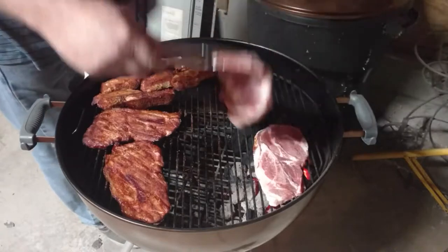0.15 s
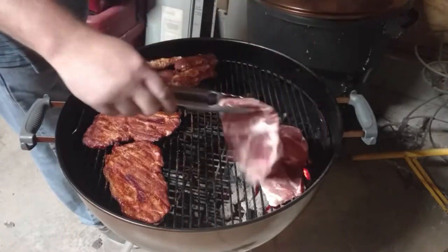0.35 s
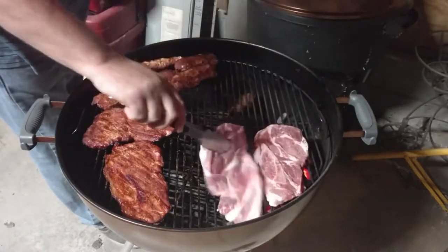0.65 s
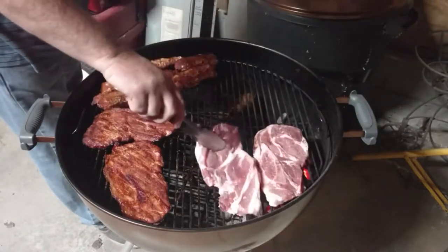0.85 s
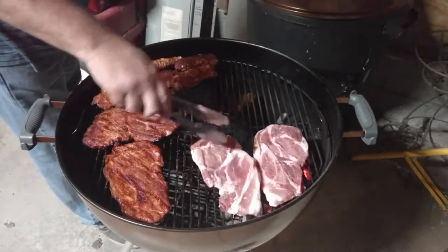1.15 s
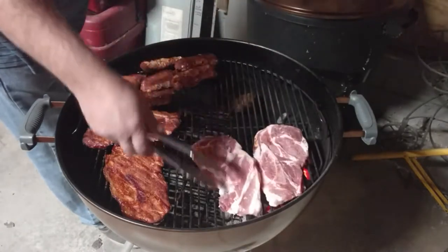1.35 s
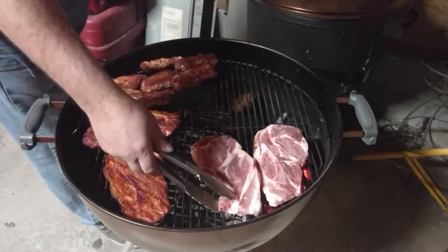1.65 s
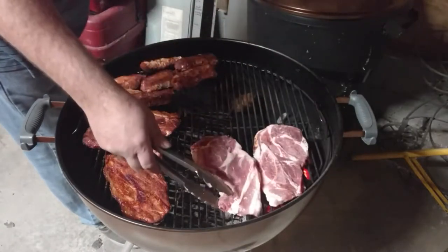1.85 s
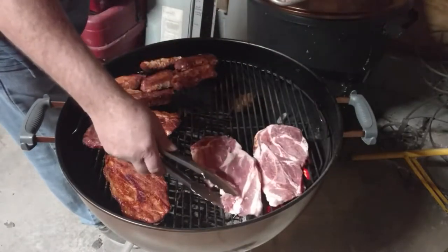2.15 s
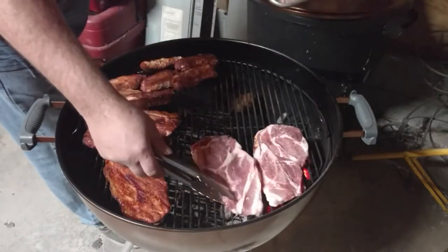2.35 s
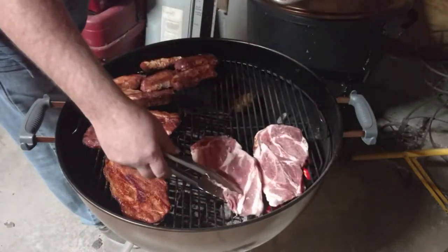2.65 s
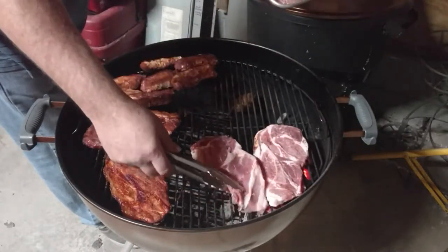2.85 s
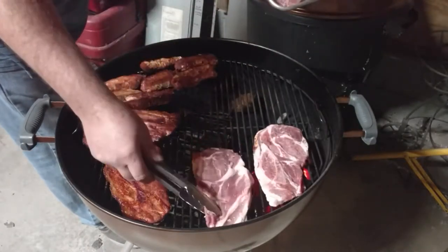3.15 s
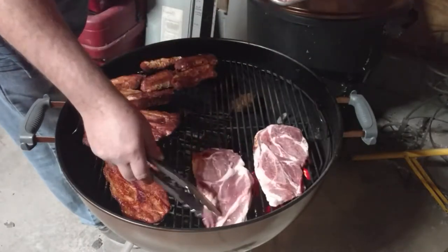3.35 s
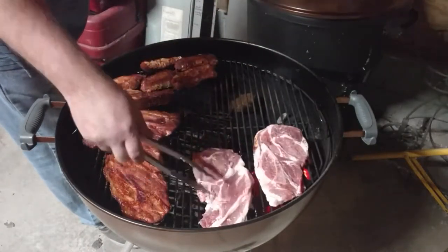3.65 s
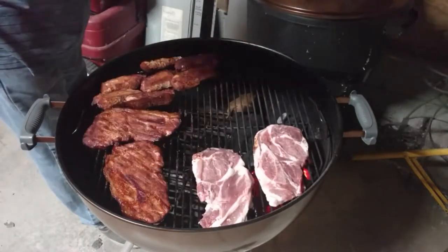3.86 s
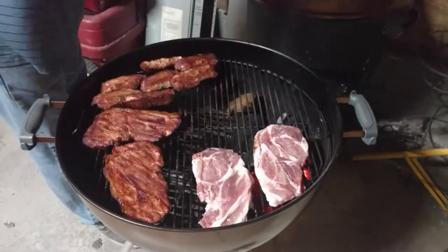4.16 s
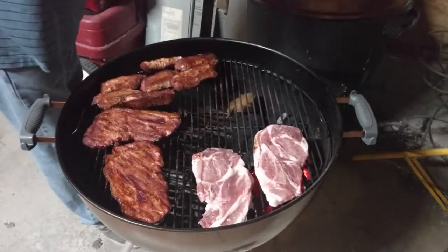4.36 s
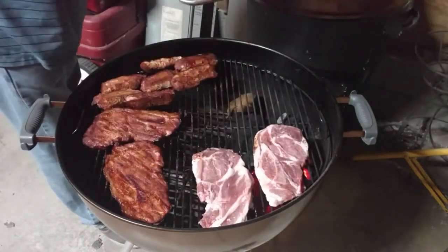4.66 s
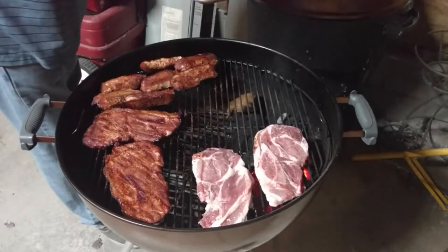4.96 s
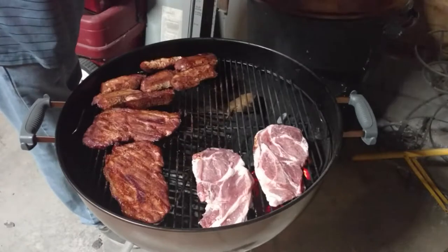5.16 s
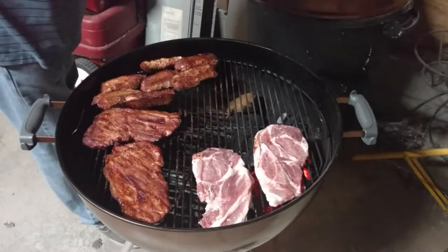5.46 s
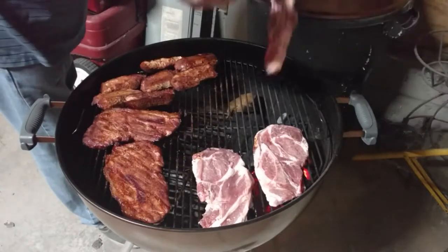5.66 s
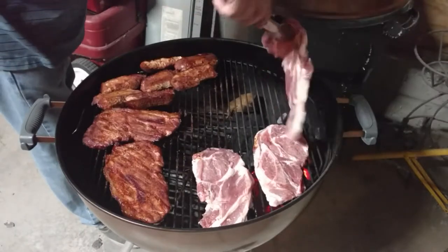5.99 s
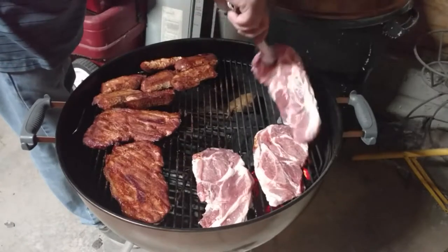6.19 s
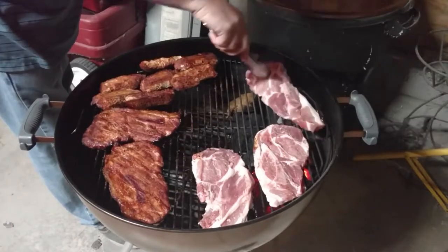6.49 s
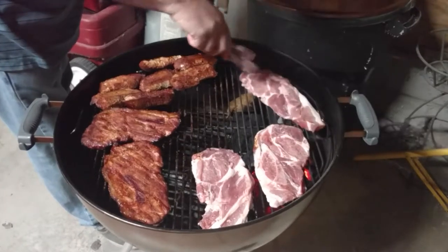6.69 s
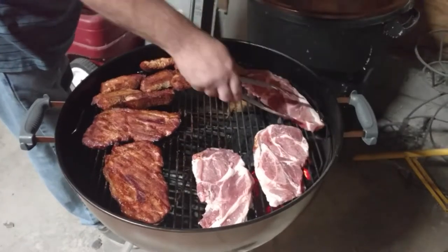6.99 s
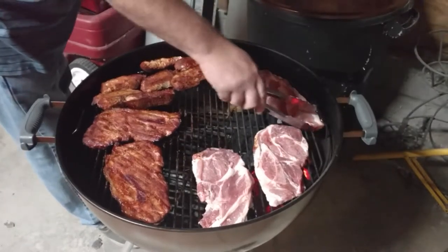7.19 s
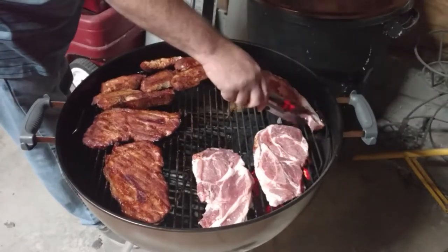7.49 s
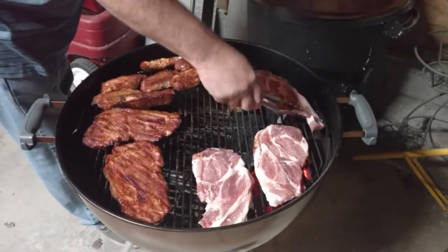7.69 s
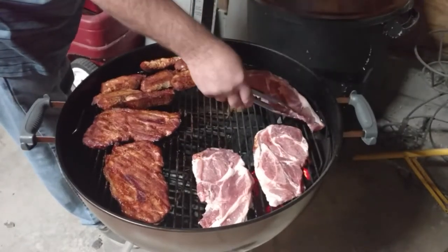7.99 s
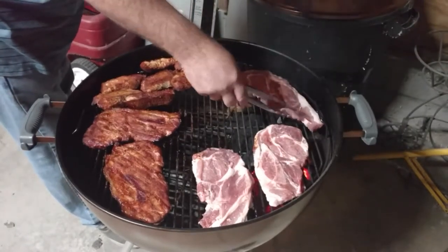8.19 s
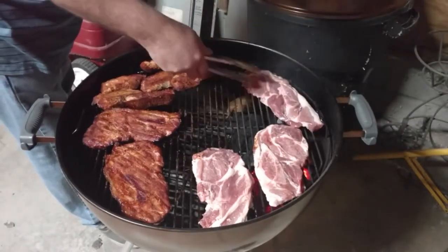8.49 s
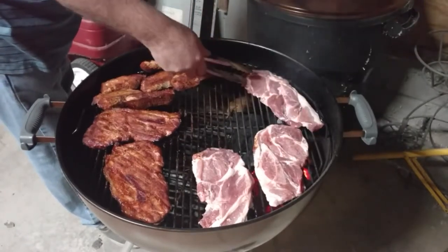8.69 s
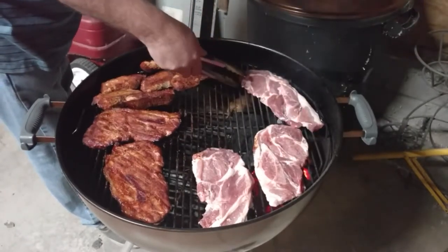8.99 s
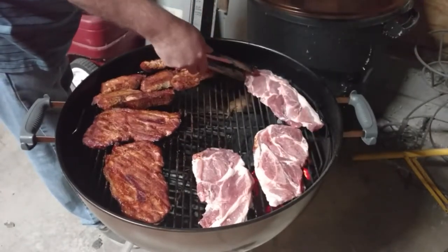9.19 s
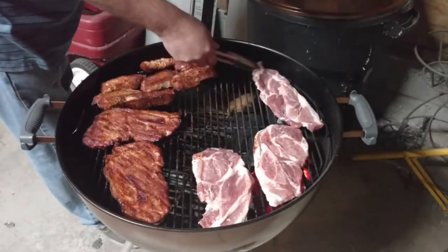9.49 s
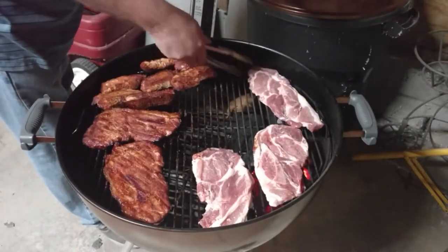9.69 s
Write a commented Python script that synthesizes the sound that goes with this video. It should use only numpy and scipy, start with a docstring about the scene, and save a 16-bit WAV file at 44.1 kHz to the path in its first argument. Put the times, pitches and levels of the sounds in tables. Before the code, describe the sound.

Close to an outdoor charcoal grill, steaks land with soft flops and steel tongs clink against the rattling wire grate. A loud, sharp snap on a tray and a short scrape interrupt, after which everything is briefly quieter. One more piece of meat goes down and the tongs clatter again, last of all near the end. A gentle sizzle, a faint humming fan and a low yard rumble continue throughout.

```python
"""Meat sizzles softly, a fan hums nearby and the yard rumbles low. The sizzle is tiny bursts of fat.
Raw steaks flop onto a charcoal kettle grill and are nudged about; steel tongs tap and clank on the
wire grate, making it ring and rattle. Out of sight something hard snaps against a tray, which then
scrapes. The loud snap makes the camera's gain control turn everything down for more than a second."""
import sys
import numpy as np
from scipy import signal
from scipy.fft import rfft, irfft, next_fast_len
from scipy.io import wavfile
from scipy.ndimage import uniform_filter1d, minimum_filter1d

SR = 44100
rng = np.random.default_rng(int(sys.argv[2]) if len(sys.argv) > 2 else 0)


def store_pcm(level_fs):
    """Save levels as 16-bit WAV."""
    pcm = np.round(np.clip(level_fs, -1, 1) * 32767).astype(np.int16)
    wavfile.write(sys.argv[1], SR, np.atleast_2d(pcm).T)


N = 433944
TIME = np.arange(N) / SR
PIVOT_HZ = 1600  # "brightness" tilts a sound's spectrum around this frequency
# bands in which a hit on the grate is shaped: (low edge [Hz], high edge [Hz])
HIT_BANDS = [(125, 400), (400, 1000), (1000, 2600), (2600, 5000), (5000, 10000), (10000, 15000)]


def undb(db):
    """Turn decibels into a factor to multiply by."""
    return 10 ** (np.asarray(db) / 20)


def rms(x):
    """Average strength of a signal (root mean square)."""
    return np.sqrt(np.mean(x ** 2))


def noise(size):
    """Two unrelated channels of white noise."""
    return rng.standard_normal((2, size))


def fade(t, t60):
    """Die away smoothly; the fade time t60 is the seconds taken to drop 60 dB."""
    return np.exp(-np.log(1000) * t / t60)


def burst(t, rise_s, t60):
    """Rise to a peak of 1, then fade."""
    shape = (1 - np.exp(-t / rise_s)) * fade(t, t60)
    return shape / shape.max()


def colour(x, points):
    """Give x a tone colour from (frequency [Hz], level [dB]) points; white noise keeps its power."""
    hz, db = np.transpose(points)
    gain = undb(np.interp(np.log(np.fft.rfftfreq(x.shape[-1], 1 / SR) + 1), np.log(hz), db))
    return irfft(rfft(x) * gain / rms(gain), x.shape[-1])


def drift(turns_per_s):
    """Wander at random, roughly between -1 and 1."""
    step = int(SR / turns_per_s)
    return uniform_filter1d(np.repeat(rng.standard_normal(N // step + 1), step), step)[:N]


def grit(size, depth_db=4, slips_per_s=600):
    """Tiny slips and bounces of metal on metal make the level jump about."""
    gain = undb(depth_db * drift(slips_per_s)[:size])
    return gain / rms(gain)


def ringing(hz, gains, t60s, blur_hz, t):
    """Fading tones of struck metal, in two channels; wandering phases blur each pitch."""
    steps = np.sqrt(2 * np.pi * np.abs(blur_hz) / SR) * rng.standard_normal((len(t), len(hz)))
    phase = rng.uniform(0, 2 * np.pi, (2, 1, len(hz))) + np.cumsum(steps, axis=0)
    tones = np.sin(2 * np.pi * hz * t[:, None] + phase) * (gains * fade(t[:, None], t60s))
    return tones.sum(axis=-1) / np.sqrt(np.sum(gains ** 2) / 2)


def add(track, start_s, sound):
    """Mix a sound into the track at the given time."""
    i = int(start_s * SR)
    track[:, i:i + sound.shape[1]] += sound[:, :N - i]


def frying(start_db=-47.5, drying_db_per_s=-0.5842, rise_s=0.044):
    """Strength of the sizzle: it sinks as the meat dries and flares when meat wets the hot wires."""
    # flares from fresh or pressed meat: (time [s], level [dB], fade time [s])
    flares = [(0, -49, 1.4), (.65, -50.5, 16), (6.3, -49, 7.7), (6.325, -46.5, .14), (7.45, -49.5, 6.5)]
    power = undb(start_db + drying_db_per_s * TIME) ** 2
    for s, db, t60 in flares:
        power += (undb(db) * burst(np.maximum(TIME - s, 0), rise_s, t60)) ** 2
    return np.sqrt(power)


def sizzle(pops_per_s=3000, pop_spread_db=2, pop_db=-9, warble_db_per_octave=5, flutter_db=1):
    """Tiny bursts of fat merge into a steady hiss; a watery digital warble is added to the top treble."""
    # tone colour of frying fat: (frequency [Hz], level [dB])
    fat_colour = [(300, -15), (1000, -1), (2000, 0.5), (3200, 1.5), (4000, 2.5), (5500, 1), (7000, 2),
                  (7800, -0.5), (9200, 1.5), (10500, -5), (12000, -5), (13000, -8.5), (15000, -10.5)]
    # edges of the digital warble's bands: (frequency [Hz])
    edges = [7000, 8200, 9400, 10600, 11800, 13000, 14200, 16000]
    sizes = undb(pop_spread_db * np.minimum(rng.exponential(size=N), 4))
    pops = (rng.random(N) < pops_per_s / SR) * sizes * rng.uniform(-0.98, 1, (2, N))
    fizz = colour(noise(N) + undb(pop_db) * pops / rms(pops), fat_colour)
    size = next_fast_len(N)
    spectrum, hz = rfft(fizz, size), np.fft.rfftfreq(size, 1 / SR)
    for low, high in zip(edges, edges[1:]):
        band = irfft(spectrum * ((hz >= low) & (hz < high)), size)[:, :N]
        warble = undb(warble_db_per_octave * np.log2(low / 6000) * drift(22))
        fizz += band * (warble / rms(warble) - 1)
    return fizz / rms(fizz) * frying() * undb(flutter_db * drift(13))


def fan_air(level_db=-58, flutter_db=2.5):
    """The fan pushes air with a softly wavering rush."""
    # tone colour of the rush: (frequency [Hz], level [dB])
    air_colour = [(30, -27), (70, -5.5), (130, -1.5), (280, 2.5), (420, 1), (600, 0.5), (800, 3.5),
                  (1300, -7), (2000, -8.5), (4000, -8.5), (12000, -18)]
    return colour(noise(N), air_colour) * undb(level_db + flutter_db * drift(6.9))


def fan_hum(level_db=-56, swell_db=3.5, period_s=7.15, crest_s=7.55, speed_drift=0.0018, waver_db=1.5):
    """Fan and motor tones follow the fan's speed, slowly swell and ebb together, and waver singly."""
    # the tones: (frequency [Hz], relative level [dB])
    tones = [(118.6, -19), (279.8, -20.5), (471.3, -2), (829, -16.5), (942, -31), (1060, -20)]
    fan_time = np.cumsum(1 + speed_drift * drift(5)) / SR
    swell = undb(level_db + swell_db * np.cos(2 * np.pi * (TIME - crest_s) / period_s))
    hum = sum(undb(db + waver_db * drift(6)) * np.sin(2 * np.pi * hz * fan_time) for hz, db in tones)
    return np.sqrt(2) * swell * hum


def yard_rumble(level_db=-62, flutter_db=3.5, middle_db=-10):
    """A low, wavering rumble that mostly pushes left and right in opposite directions."""
    # tone colour of the rumble: (frequency [Hz], level [dB])
    rumble_colour = [(25, -24), (50, -11), (80, -2.5), (130, 4.5), (220, -0.5), (400, -2.5), (900, -10),
                     (3000, -68)]
    middle, side = colour(noise(N), rumble_colour) * undb(level_db + flutter_db * drift(6.9))
    return undb(middle_db) * middle + np.array([side, -side])


def hit_levels(material, db, brightness, clang_db=0, clang_hz=2500, clang_octaves=0.53):
    """Level per band: the material's colour, brighter for a sharp hit, plus the clang of bare wire."""
    centres = np.sqrt(np.prod(HIT_BANDS, axis=1))
    hz, dbs = np.transpose(material)
    material_db = np.interp(np.log(centres), np.log(hz), dbs)
    clang = clang_db * np.exp(-0.5 * (np.log2(centres / clang_hz) / clang_octaves) ** 2)
    return db + material_db + brightness * np.log2(centres / PIVOT_HZ) + clang


def grate_ring(t, t60, place):
    """The grate's tones depend on where it is hit: 0 middle, 1 front, 2 side, 3 back, or in between."""
    # tones of grate and kettle: (frequency [Hz], fade time [multiple of the hit's],
    # level when hit in the middle [dB], at the front [dB], at the side [dB], at the back [dB])
    tones = [(172, 2.2, 2, -4, 2, -3), (202, 2.2, -11, -11, 9, 0), (254.6, 2.2, -4, -10, 2, 1),
             (348.5, 2.5, -1, -0.5, -19, -2), (502, 1.7, 5.5, 9, 8.5, 7.5), (542, 2.1, -21, 10, -10, -9),
             (684, 1.9, 1, -7, -8, 11), (768, 2.7, -2, 8, -14, 10), (802, 2, -7, -3, -8, 5.5),
             (1002, 2, 3, 0, -5, -7), (1035, 2.3, 0, -2, -16, -12), (1105, 2, -10, -1, -13, -10),
             (1255, 2.2, -20, -14, 5.5, -10), (1298, 1.7, -5, -11, 4, 0.5), (1747, 1.5, -1, -2, -8, -17),
             (1875, 1.6, 5, -2, 3, -18), (2002, 1.7, 1, 2, -11, -6), (2138, 1.7, -3, 4, 15, -8),
             (2233, 1.7, 4, 1, 14, -16), (2310, 1.4, -14, -3, 12, -10), (2384, 1.8, -12, 1, 14, -7),
             (2755, 1.4, 4, -20, 10, -12), (2893, 1.6, -6, 0.5, 14, 3), (2993, 2.4, 4, 9.5, 9, -5),
             (3180, 2, -3, 8, 9, -12), (3338, 1.4, 11, 4, 3, 9), (3455, 1.5, 10, 12, 12, 10),
             (3490, 2, -2, 7, 5, 5), (3660, 1.8, 4, 5, 9.5, 4), (3737, 1.7, -14, -2, -6, 7),
             (3895, 1.5, -16, 0, -1, 5), (4700, 1.2, -5, -11, 4, -5), (4870, 1.3, 0, -6, -3, -5)]
    hz, stretch, *spots = np.transpose(tones)
    place = np.clip(place, 0, len(spots) - 1)
    gains = sum(undb(db) * max(0, 1 - abs(place - k)) for k, db in enumerate(spots))
    # the grate chatters on its rests, which blurs the high tones most
    return ringing(hz, gains, t60 * stretch, blur_hz=7 + 0.0042 * hz, t=t)


def grate_hit(band_dbs, rise_ms, t60, place, ring_db, crack_db, tick_db=14):
    """One hit on the grate: a tick, a crack, the rattle of loose wires and a ring."""
    # tone colour of loose wires: (frequency [Hz], level [dB])
    rattle_colour = [(150, 11), (1000, 1.5), (2000, 9), (2600, 6), (3300, 8), (4000, 9.5),
                     (5500, 9), (8000, 0.5), (14000, -12)]
    t = TIME[:SR // 3]
    ring = undb(ring_db) * grate_ring(t, t60, place)
    rattle = colour(noise(len(t)), rattle_colour) * grit(len(t))
    crack = undb(crack_db) * rattle * fade(t, t60=0.0081)
    # the tick is so short that only a sudden hit lets it through
    tick = undb(tick_db) * noise(len(t)) * fade(t, t60=0.0025)
    attack = 1 - np.exp(-t * 1000 / rise_ms)
    out = 0
    for edges, db in zip(HIT_BANDS, band_dbs):
        rattle_t60 = t60 * (1000 / np.mean(edges)) ** 0.17  # the treble dies first
        hit = attack * (tick + crack + ring + rattle * fade(t, rattle_t60))
        band = signal.sosfilt(signal.butter(4, edges, "band", fs=SR, output="sos"), hit)
        out += undb(db) * band / rms(band[:, :int(0.04 * SR)])  # the first 40 ms set the level
    return out


def meat_flops():
    """Soft meat lands on the grate with a dull push."""
    # flops: (time [s], level [dB], brightness [dB per octave], place [as in grate_ring])
    flops = [(0.715, -55, 1.5, 1.7), (1.690, -50.5, -0.4, 0.4), (2.068, -53.5, 1, 0.74),
             (3.215, -66, -1, -2.5), (6.325, -57, 1.5, 1.4), (8.19, -71.5, -4, 1.6)]
    # tone colour of the meat's push: (frequency [Hz], level [dB])
    meat_colour = [(220, 0.5), (630, 1), (1600, -2), (3600, -9), (7000, -7), (12000, -18)]
    out = np.zeros((2, N))
    for s, db, brightness, place in flops:
        levels = hit_levels(meat_colour, db, brightness)
        add(out, s, grate_hit(levels, rise_ms=0.78, t60=0.19, place=place, ring_db=-1, crack_db=-4))
    return out


def tong_taps():
    """Hard steel tongs strike the grate with a bright clank."""
    # taps: (time [s], level [dB], brightness [dB per octave], clang [dB], ring over rattle [dB],
    # rise [ms], fade time [s], place [as in grate_ring], crack over rattle [dB])
    taps = [(1.634, -50, -3.5, 0, 6, 1.8, .085, 0, 0), (1.893, -49.5, -0.5, -5, -6, 12, 0.14, 2.5, 2),
            (1.903, -47.5, 1.5, -8, -2, 7, 0.097, 2, 3), (2.269, -37.5, 1.3, -6, 8, 0.33, 0.12, 0, 10),
            (2.413, -50.5, -2, 0.5, -1, 1, 0.19, 2.5, 3), (3.4395, -38, -0.2, -1.5, 8, 0.15, 0.14, 1, 9),
            (3.827, -60, 3, -5, 0, 2.4, 0.046, 2.5, 3), (6.282, -63, 4.5, -8, 3, 0.23, .015, -2, -2),
            (7.2822, -36.8, 0.5, 7.5, 2, 3.5, 0.055, 2, 4), (7.297, -47, 2, 8, 4, 6.5, 0.13, 2, 3),
            (7.313, -47.5, 0, 8, 2, 1.2, 0.079, 2, 3), (7.3505, -43.5, -2.5, 5, 2.5, 1, 0.12, 2.5, 2),
            (7.403, -52, -1, -5, 1, 2, 0.27, 3, 3), (9.085, -44, -0.8, -1.5, -3.5, 1.9, 0.15, 2.5, 5),
            (9.7133, -38, -3, 4, 2, 0.55, 0.13, 3, 3), (9.7195, -40, 0.2, -0.5, 6, 1.3, 0.15, 3, 1),
            (9.728, -43.5, 0.5, 2.5, 10, 2.1, 0.16, 3, 0)]
    # tone colour of the steel's push: (frequency [Hz], level [dB])
    steel_colour = [(220, -13.5), (630, -6), (1600, 0.5), (3600, -1), (7000, -3), (12000, -23)]
    out = np.zeros((2, N))
    for s, db, brightness, clang_db, ring_db, rise_ms, t60, place, crack_db in taps:
        levels = hit_levels(steel_colour, db, brightness, clang_db)
        add(out, s, grate_hit(levels, rise_ms, t60, place, ring_db, crack_db))
    return out


def tong_pings(rise_s=0.00062, blur_hz=30):
    """Glancing touches set the tongs' own arms ringing."""
    # tones of the arms: (frequency [Hz], relative level [dB])
    arm_tones = [(4350, 2.5), (5760, -1), (6660, 0), (7040, -12)]
    # touches: (time [s], level [dB], fade time [s])
    touches = [(1.906, -44, .08), (2.27, -39, .04), (2.413, -39.5, 0.07), (3.44, -42, .06),
               (7.284, -37, .07)]
    out, t = np.zeros((2, N)), TIME[:SR // 3]
    hz, dbs = np.transpose(arm_tones)
    attack = 1 - np.exp(-t / rise_s)
    for s, db, t60 in touches:
        add(out, s, undb(db) * attack * ringing(hz, undb(dbs), t60, blur_hz, t))
    return out


def tray_snap(start_s=4.3172, rise_s=0.00004, crack_db=-17.5, crack_t60=0.0074):
    """Something hard snaps against the tray: a crack of noise and very short tones."""
    # tones of the snap: (frequency [Hz], level [dB], fade time [s])
    tones = [(326, -17.5, 0.025), (830, -21.5, 0.044), (1204, -4.5, 0.016), (1670, -13, 0.0081),
             (2330, -20, 0.01), (3520, -13, 0.0093), (4330, -20, 0.009), (5260, -19, 0.0086),
             (5800, -19.5, 0.0092), (6700, -29, 0.0049), (7980, -22, 0.008), (9340, -19, 0.018),
             (11500, -22.5, 0.01)]
    # tone colour of the crack: (frequency [Hz], level [dB])
    crack_colour = [(2000, -23), (3500, 0), (4500, 2), (6000, -1), (8000, 3), (10000, -6), (15000, -14)]
    out, t = np.zeros((2, N)), TIME[:SR // 2]
    ring = sum(undb(db) * np.exp(2j * np.pi * hz * t) * fade(t, t60) for hz, db, t60 in tones)
    ring *= 1 - np.exp(-t / rise_s)
    add(out, start_s, -np.array([ring.imag, ring.real]))  # channels a quarter cycle apart
    add(out, start_s, undb(crack_db) * colour(noise(len(t)), crack_colour) * fade(t, crack_t60))
    # a low cut removes the bass, leaving a thin, sharp snap
    return signal.sosfilt(signal.butter(4, 250, "high", fs=SR, output="sos"), out)


def rubbing(body_gain, hiss_gain, brightness):
    """Uneven rubbing makes the tray's body ring and the touching surfaces hiss."""
    # tone colour of the tray: (frequency [Hz], level [dB])
    tray_colour = [(50, -65), (150, -38), (550, -21), (780, -5.5), (1050, -3.5), (1320, -6), (1780, 5.5),
                   (2100, 2.5), (2550, -15), (2950, -3), (3400, -20), (5000, -33), (15000, -48)]
    # tone colour of the hiss: (frequency [Hz], level [dB])
    hiss_colour = [(1500, -18), (3200, 10), (4200, 6), (4800, 13), (5300, 7), (7400, 8.5), (8800, 2),
                   (10500, -9), (15000, -13)]
    size = len(body_gain)
    tilted = [(hz, db + brightness * np.log2(hz / PIVOT_HZ)) for hz, db in tray_colour]
    body = colour(noise(size), tilted)
    hiss = colour(noise(size), hiss_colour) * grit(size)
    return body_gain * body + hiss_gain * hiss


def tray_catches(rise_share=0.12, hiss_db=-12.5):
    """The tray catches as it is shifted, giving short scrapes."""
    # catches: (time [s], level [dB], fade time [s], brightness [dB per octave])
    catches = [(4.385, -38.5, 0.074, 7), (4.5185, -27, 0.0097, 2), (4.5287, -18, 0.019, 3),
               (4.5477, -13, 0.014, -0.5), (4.556, -31, 0.049, 4), (4.578, -30, .012, 5),
               (4.641, -27, 0.043, -3.5), (4.861, -37.5, 0.054, 0.5), (4.913, -46, 0.032, -4)]
    out, t = np.zeros((2, N)), TIME[:SR // 2]
    for s, db, t60, brightness in catches:
        grip = undb(db) * burst(t, rise_share * t60, 2 * t60) ** 2  # squared for a soft start
        add(out, s, rubbing(grip, undb(hiss_db) * grip, brightness))
    return out


def tray_slide(start_s=4.497, rise_s=0.013, length_s=0.15, body_db=-31.5, hiss_db=-37.5):
    """One shove of the tray: its body rings at first, and it hisses until it stops."""
    out, t = np.zeros((2, N)), TIME[:SR // 2]
    moving = (1 - np.exp(-t / rise_s)) ** 2 * fade(np.maximum(t - length_s, 0), t60=0.05)
    scrape = rubbing(undb(body_db) * burst(t, rise_s, t60=0.4), undb(hiss_db), brightness=0)
    add(out, start_s, moving * (scrape + edge_whistle(t)))
    return out


def edge_whistle(t, level_db=-32.5, start_hz=7150, climb_hz_per_s=10000, blur_hz=480, t60=0.46):
    """The tray's sliding edge gives a thin, rough whistle that climbs in pitch."""
    wander = np.sqrt(2 * np.pi * blur_hz / SR) * noise(len(t))
    phase = np.cumsum(2 * np.pi * (start_hz + climb_hz_per_s * t) / SR + wander, axis=1)
    return undb(level_db) * np.sin(phase) * fade(t, t60) * grit(len(t))


def with_echo(sound, early_db=-12, early_t60=0.072, late_db=-10, late_t60=0.41, rise_s=0.00076):
    """Nearby walls answer a sound with bright first echoes, then a duller tail."""
    # tone colour of the tail: (frequency [Hz], level [dB])
    tail_colour = [(100, -22), (300, 2), (540, 1), (800, 6.5), (1200, 0), (2000, -2.5), (3600, 1),
                   (5000, 1.5), (9000, -11), (15000, -29)]
    t = TIME[:SR // 2]
    early_fade, late_fade = fade(t, early_t60), fade(t, late_t60)
    early = undb(early_db) * noise(len(t)) * early_fade / np.linalg.norm(early_fade)
    late = undb(late_db) * colour(noise(len(t)), tail_colour) * late_fade / np.linalg.norm(late_fade)
    echoes = (early + late) * (1 - np.exp(-t / rise_s))
    return sound + signal.fftconvolve(sound[:1], echoes, axes=1)[:, :N]


def microphones(pair, balance, widest_deg=None):
    """A microphone pair turns two signals into left and right; width and balance vary with frequency."""
    # stereo width: (frequency [Hz], angle [degrees: 0 all middle, 90 all side])
    width = [(300, 20.5), (700, 12.4), (1280, 0.98), (1950, 34.6), (2450, 82.7), (2660, 91), (3200, 30),
             (3820, 9.7), (4450, 45), (5000, 81), (5220, 87), (5750, 45.5), (6450, 16), (7400, 39),
             (8200, 18), (14000, 45.5)]
    hz = np.fft.rfftfreq(N, 1 / SR)
    angle = np.radians(np.clip(np.interp(hz, *np.transpose(width)), 0, widest_deg))
    middle, side = rfft(pair) * np.array([np.cos(angle), np.sin(angle)])
    left_gain = undb(np.interp(hz, *np.transpose(balance)) / 2)
    return irfft(np.array([(middle + side) * left_gain, (middle - side) / left_gain]), N)


def scene():
    """Steady sizzle, fan and rumble, with the knocks of grill and tray on top."""
    # balance of sizzle and fan air: (frequency [Hz], left minus right [dB])
    steady_balance = [(1400, -1), (2000, -0.5), (3200, 1.5), (4500, 0), (8000, 3), (14000, 0)]
    # balance of the knocks: (frequency [Hz], left minus right [dB])
    knock_balance = [(700, .5), (1400, -1.5), (1950, -5), (2600, 1.5), (3500, -0.5), (6000, 2), (12000, -1)]
    steady = microphones(sizzle() + fan_air(), steady_balance)
    grill = tong_taps() + meat_flops() + tong_pings()
    tray = with_echo(tray_snap() + tray_catches() + tray_slide())
    knocks = microphones(grill + tray, knock_balance, widest_deg=76)
    return steady + knocks + yard_rumble() + fan_hum()


def gain_control(x, threshold_db=-10, hold_s=0.6, release_db_per_s=11, attack_s=0.00083):
    """A loud peak turns the volume down; it stays down for a moment, then creeps back."""
    peak_db = 20 * np.log10(np.abs(x).max(axis=0) + 1e-9)
    over_db = np.maximum(peak_db - threshold_db, 0)
    half = int(hold_s * SR / 2)
    # the biggest overshoot within the last hold_s
    held_db = -minimum_filter1d(-over_db, 2 * half + 1, origin=half, mode="constant")
    recovery_db = release_db_per_s * TIME
    cut_db = np.maximum.accumulate(held_db + recovery_db) - recovery_db
    smoothing = np.exp(-1 / (attack_s * SR))
    return x * undb(-signal.lfilter([1 - smoothing], [1, -smoothing], cut_db))


def record(dry, ceiling=0.85, top_hz=15500):
    """The camera turns down after loud peaks, flattens the highest and cuts the top treble."""
    clipped = np.clip(gain_control(dry), -ceiling, ceiling)
    return signal.sosfilt(signal.ellip(10, 0.2, 80, top_hz, fs=SR, output="sos"), clipped)


dry = scene()
out = record(dry)
store_pcm(out)
```